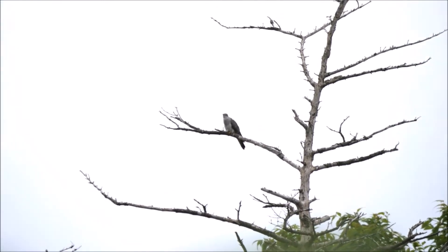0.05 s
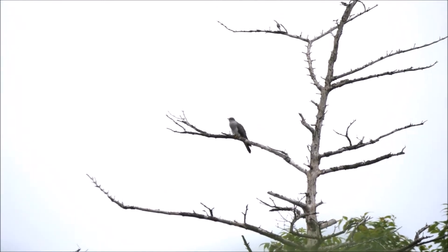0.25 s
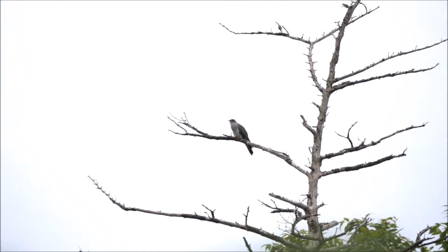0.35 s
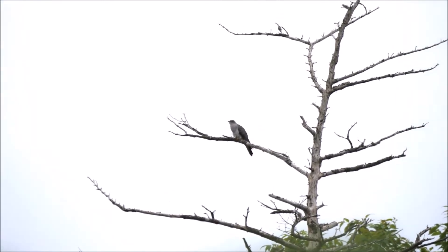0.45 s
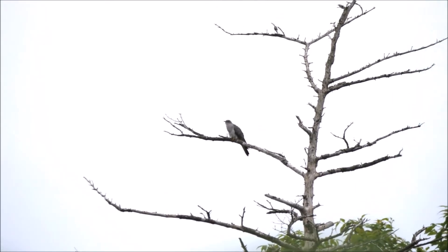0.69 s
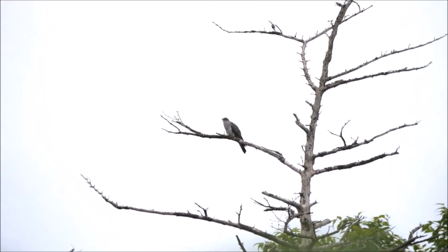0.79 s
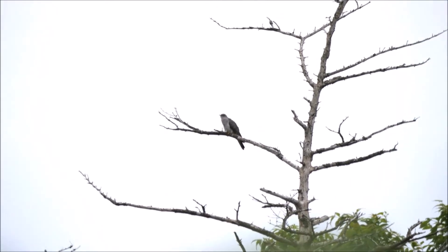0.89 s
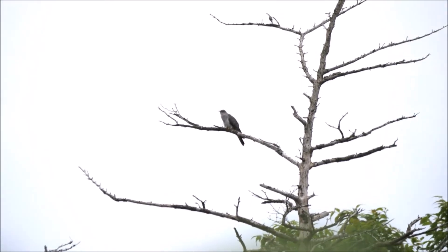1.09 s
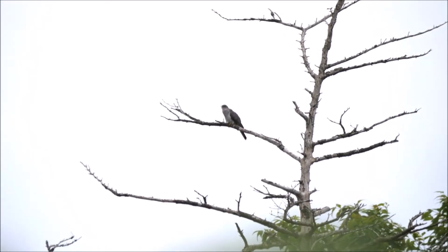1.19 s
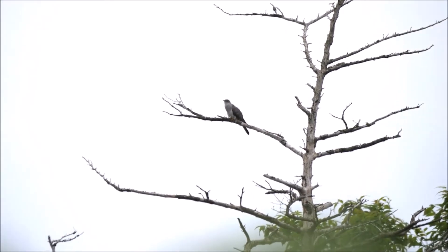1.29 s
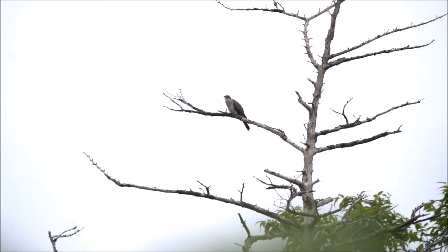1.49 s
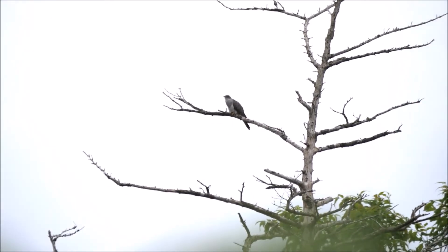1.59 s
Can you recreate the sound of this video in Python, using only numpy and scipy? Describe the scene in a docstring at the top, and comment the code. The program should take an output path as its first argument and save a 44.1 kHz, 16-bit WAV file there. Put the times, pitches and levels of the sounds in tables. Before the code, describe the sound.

A cuckoo calls two notes outdoors, echoing softly, with faint small birds far off.

```python
"""Cuckoo in a wood

A cuckoo on a dead tree gives its two-note call: a loud arched whistle, then a low note that cracks
upward and sinks back. The surrounding wood echoes it. Small birds chirp far off, over faint ticks,
a soft outdoor murmur and microphone hiss."""
import sys
import numpy as np
from scipy import signal
from scipy.fft import rfft, irfft, next_fast_len
from scipy.io import wavfile
from scipy.ndimage import uniform_filter1d, map_coordinates

SR = 44100
rng = np.random.default_rng(int(sys.argv[2]) if len(sys.argv) > 2 else 0)


def int16_out(signal):
    """Quantize to a 16-bit WAV file."""
    q = np.round(np.clip(np.atleast_2d(signal).T, -1, 1) * 32767)
    wavfile.write(sys.argv[1], SR, q.astype(np.int16))


N = 72765
T = np.arange(N) / SR

# cuckoo notes: time_s, pitch_hz, level_db
ARCHED_NOTE = [(.178, 600, -42), (.188, 750, -25.5), (.198, 866, -17.5), (.208, 866, -10),
               (.231, 865, -7.2), (.241, 853, -8.7), (.256, 795, -21), (.267, 762, -12.5), (.278, 700, -19),
               (.292, 600, -38)]
CRACKED_NOTE = [(.528, 590, -37), (.537, 654, -19), (.548, 676, -17), (.573, 701, -15.5),
                (.585, 709, -20.5), (.589, 866, -22), (.622, 867, -23.5), (.652, 855.3, -23),
                (.681, 778, -29.5), (.691, 717, -16.5), (.701, 642, -23), (.711, 602, -40)]
NEXT_CALL_ONSET = [(1.635, 599, -45), (1.643, 679, -37), (1.65, 747, -18.5)]
# distant bird notes: time_s, pitch_hz, level_db
FALLING_CHIRP = [(.057, 3594, -47), (.067, 3253, -28.5), (.081, 3024, -39), (.09, 2580, -38.5),
                 (.1, 1840, -33), (.114, 1486, -40)]
FAINT_FALLING_CHIRP = [(0.526, 3050, -44), (.535, 2350, -48), (0.544, 1837, -40.5), (0.569, 1450, -52)]
THIN_TWITTER = [(1.27, 4250, -50), (1.3, 4150, -59), (1.345, 4050, -52), (1.39, 3990, -52),
                (1.435, 3430, -50)]
RISING_CHIRP = [(1.467, 2427, -46), (1.472, 2526, -41), (1.487, 3410, -44.5), (1.5, 3330, -48)]
SHORT_WHISTLE = [(1.522, 2000, -45), (1.534, 2166, -39), (1.556, 2150, -41)]
FAR_HOOT = [(1.465, 385, -61), (1.495, 380.3, -37), (1.56, 374, -43)]
# echoes off trees and slopes: delay_s, gain_db
ECHOES = [(.062, -19.5), (.105, -23.5), (.172, -28), (.267, -27)]
# dry ticks: start_s, level_db
TICKS = [(0.566, -47), (1.211, -36), (1.341, -47)]
# noise spectra: freq_hz, relative_density_db
MURMUR_SPECTRUM = [(25, -60.5), (60, -31), (120, -19.5), (190, -8), (380, -4.5), (520, -5.5), (1100, -8),
                   (1900, -11.5), (2400, -17), (3200, -10), (3900, -22.5), (8000, -27), (15000, -66.5)]
HISS_SPECTRUM = [(500, -11), (3000, 8), (6500, 4.5), (8300, -7), (9200, -37), (10200, 0.5), (12500, 5),
                 (15500, 6.5)]
# left-right likeness of the murmur: freq_hz, correlation
MURMUR_CORRELATION = [(100, 1), (600, 0.96), (1300, 0.32), (3000, 0.32), (8000, 0.77)]
# narrow background tones: centre_hz, width_hz, level_db
DRONES = [(382, 17.4, -53), (695, 25, -58), (1720, 20, -59), (1914, 140, -56), (2968, 40, -58.5),
          (3415, 12, -62), (15466, 8, -64), (15525, 7.6, -74)]


def cuckoo():
    """Two-note call and the onset of the next, slightly left."""
    arched = whistle(ARCHED_NOTE) + whistle(NEXT_CALL_ONSET)
    return pan(left_db=4) * arched + pan(left_db=3) * whistle(CRACKED_NOTE)


def whistle(note, jitter=.002, shimmer_db=.2, fade_s=.004):
    """One bird note: a slightly unsteady sine following pitch and level contours."""
    time_s, pitch_hz, level_db = np.transpose(note)
    glide_hz = np.interp(T, time_s, pitch_hz) * (1 + jitter * wobble(rate_hz=150))
    envelope = amp(np.interp(T, time_s, level_db) + shimmer_db * wobble(rate_hz=150))
    fade_in = np.clip((T - time_s[0]) / fade_s + 1, 0, 1)
    fade_out = np.clip((time_s[-1] - T) / fade_s + 1, 0, 1)
    return fade_in * fade_out * envelope * np.sin(2 * np.pi * np.cumsum(glide_hz) / SR)


def far_birds():
    """Faint chirps, a quavering twitter and a low hoot."""
    chirps = sum(map(whistle, (FALLING_CHIRP, FAINT_FALLING_CHIRP, RISING_CHIRP, SHORT_WHISTLE)))
    return chirps + whistle(THIN_TWITTER, jitter=.0159) + whistle(FAR_HOOT)


def wood_echo(source, tail_db=-17, t60_s=2.2, onset_s=.035, scatter_db=-10.5, smear_s=.025):
    """Trees and slopes return a few smeared echoes and a long diffuse tail."""
    def scatter(envelope, width=.32):
        mid, side = rng.standard_normal((2, N)) * envelope / np.linalg.norm(envelope)
        return np.array([mid + width * side, mid - width * side])

    build_up = np.clip(T / onset_s - 1, 0, 1)
    response = amp(tail_db) * scatter(build_up * amp(-60 * T / t60_s))
    for delay_s, gain_db in ECHOES:
        response += amp(gain_db + scatter_db) * scatter(decay(delay_s, smear_s))
        response[:, round(delay_s * SR)] += amp(gain_db)
    return pan(left_db=2.5) * signal.fftconvolve(source[None], response, axes=1)[:, :N]


def ticks(decay_s=.003, low_hz=500, top_hz=8000):
    """Tiny dry ticks, each a puff of band-passed noise."""
    envelope = sum(amp(level_db) * decay(start_s, decay_s) for start_s, level_db in TICKS)
    band = lambda hz: hz ** 2 / (hz ** 2 + low_hz ** 2) / (1 + (hz / top_hz) ** 4)
    return envelope * unit(filtered(rng.standard_normal(N), band))


def murmur(level_db=-40, swell_db=.04):
    """Soft, nearly steady outdoor noise, centred in the bass."""
    gain = amp(level_db - swell_db * wobble(rate_hz=6.57))
    return gain * stereo_noise(MURMUR_SPECTRUM, MURMUR_CORRELATION, patchy_db=1.16)


def microphone_hiss(level_db=-44, correlation=.11):
    """Steady bright noise, nearly independent in each channel."""
    return amp(level_db) * stereo_noise(HISS_SPECTRUM, [(1000, correlation)], patchy_db=0)


def drones():
    """Faint wavering tones, each a narrow band of noise."""
    tones = np.zeros(N)
    for centre_hz, width_hz, level_db in DRONES:
        peak = lambda hz: 1 / (1 + (2 * (hz - centre_hz) / width_hz) ** 2)
        tones += amp(level_db) * unit(filtered(rng.standard_normal(N), peak))
    return tones


def stereo_noise(spectrum, correlation, patchy_db):
    """Shaped noise of rms 1, with random gain patches in time and frequency."""
    bins = signal.stft(rng.standard_normal((2, N)), nperseg=512)[2]
    patches = uniform_filter1d(rng.standard_normal(bins.shape[1:]), size=5, axis=0)
    patches = unit(uniform_filter1d(patches, size=10, axis=1))
    noise = signal.istft(bins * amp(patchy_db * patches), nperseg=512)[1][:, :N]

    def mid_side_gains(hz):
        angle_rad = np.arccos(np.clip(log_interp(correlation, hz), -1, 1)) / 2
        return amp(log_interp(spectrum, hz)) * [np.cos(angle_rad), np.sin(angle_rad)]

    mid, side = filtered(noise, mid_side_gains)
    return unit(np.array([mid + side, mid - side]))


def amp(db):
    """Decibels to gain."""
    return 10 ** (np.asarray(db) / 20)


def unit(x):
    """Scale to rms 1."""
    return x / np.sqrt(np.mean(x ** 2) + 1e-20)


def pan(left_db):
    """Stereo gains, left louder by left_db."""
    return amp(np.array([[left_db], [-left_db]]) / 2)


def decay(start_s, decay_s):
    """Step to 1, then exponential fall."""
    return (T >= start_s) * np.exp(-abs(T - start_s) / decay_s)


def wobble(rate_hz):
    """Smooth random curve with knots at rate_hz."""
    return map_coordinates(rng.standard_normal(int(N * rate_hz / SR) + 4), [T * rate_hz])


def log_interp(points, hz):
    """Interpolate on a log frequency axis."""
    freq_hz, values = np.transpose(points)
    return np.interp(np.log(hz + 1), np.log(freq_hz + 1), values)


def filtered(x, response):
    """Zero-phase filter with gain response(hz)."""
    size = next_fast_len(N + SR // 2)
    return irfft(rfft(x, size) * response(np.fft.rfftfreq(size, 1 / SR)), size)[..., :N]


def scene():
    """Near cuckoo and far birds, echoing over the background."""
    birds = cuckoo() + far_birds()
    return birds + wood_echo(birds.mean(axis=0)) + murmur() + microphone_hiss() + drones() + ticks()


def record(dry, ceiling=.47, hardness=48, top_hz=15820):
    """Recorder: soft clip of the loudest peaks, then a band limit."""
    clipped = dry / (1 + abs(dry / ceiling) ** hardness) ** (1 / hardness)
    return filtered(clipped, lambda hz: hz < top_hz)


dry = scene()
out = record(dry)
int16_out(out)
```